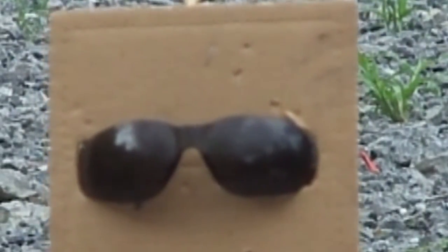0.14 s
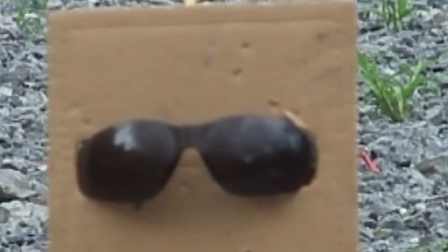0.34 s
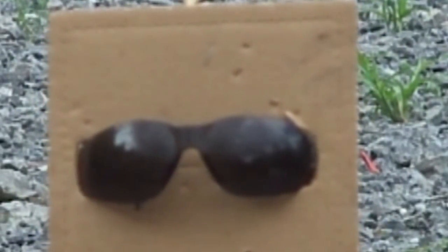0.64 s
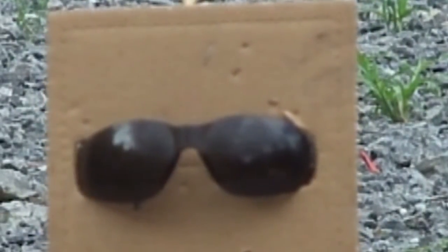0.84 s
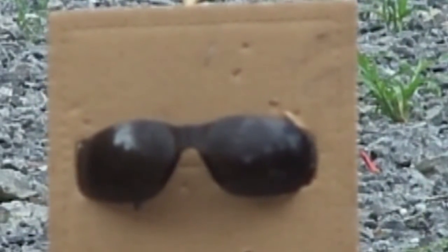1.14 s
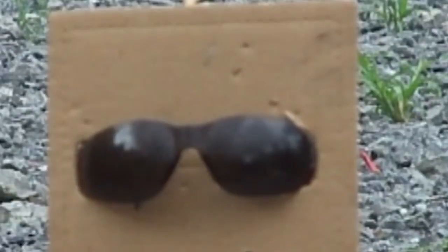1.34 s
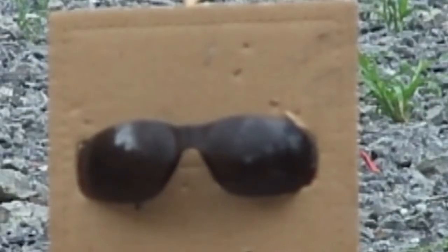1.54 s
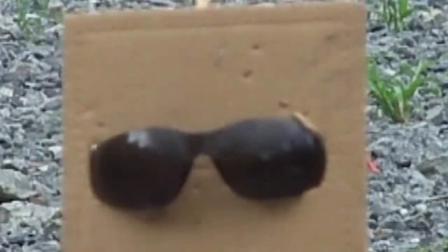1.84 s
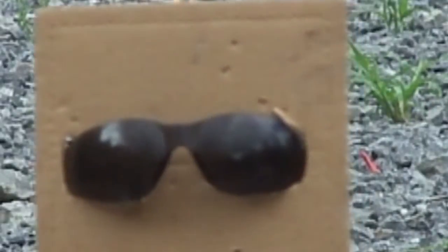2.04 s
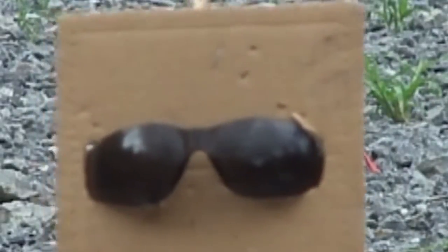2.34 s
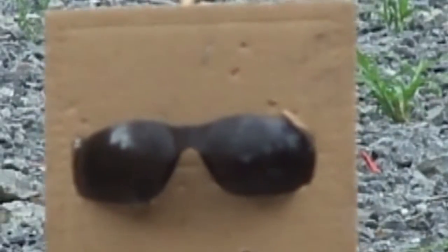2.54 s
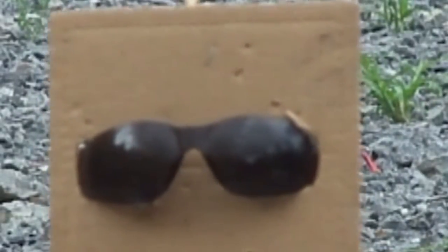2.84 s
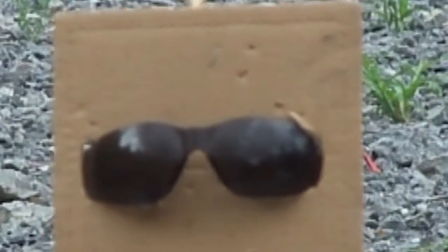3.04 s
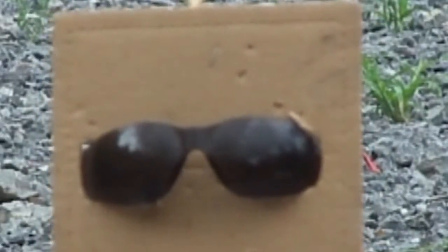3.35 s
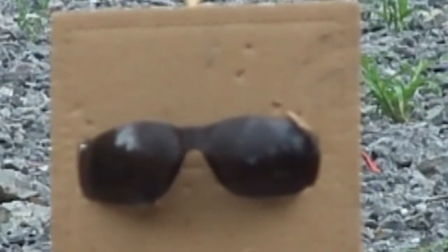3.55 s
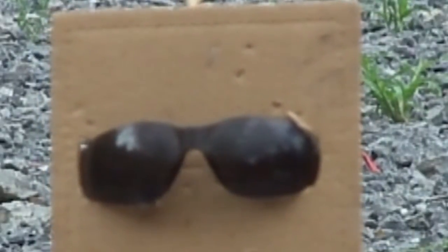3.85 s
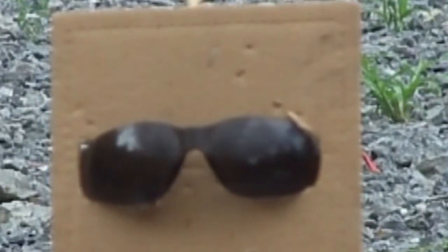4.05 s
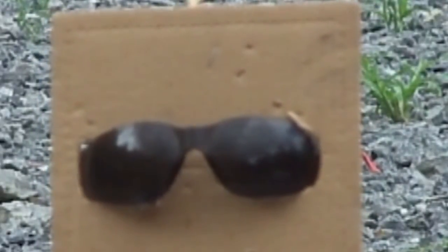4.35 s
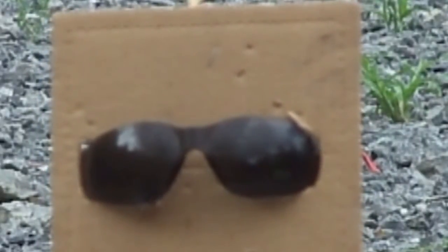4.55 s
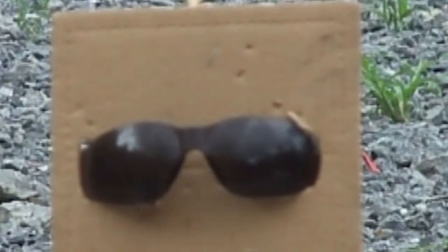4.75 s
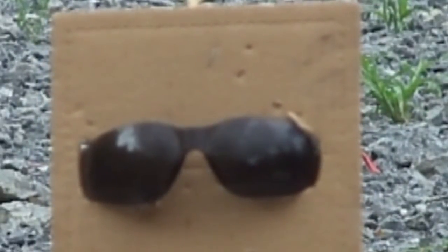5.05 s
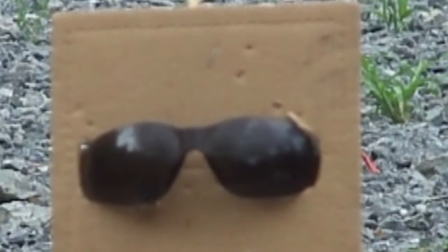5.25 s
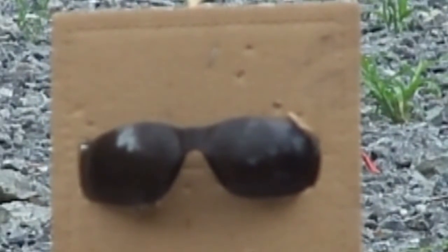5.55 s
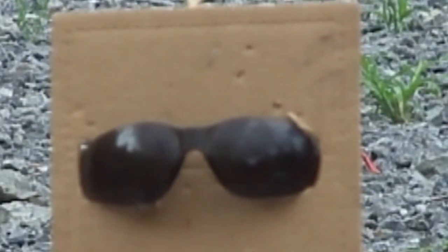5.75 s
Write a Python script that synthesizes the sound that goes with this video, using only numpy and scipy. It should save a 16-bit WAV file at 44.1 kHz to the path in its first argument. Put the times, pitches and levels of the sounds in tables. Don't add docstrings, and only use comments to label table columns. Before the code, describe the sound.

Fading echo of an earlier gunshot, then one sharp close pistol crack outdoors, its roll dying away amid clattering grit and ringing brass.

```python
import sys
import numpy as np
from scipy import signal
from scipy.fft import rfft, irfft
from scipy.io import wavfile
from scipy.ndimage import uniform_filter1d

SR = 44100
rng = np.random.default_rng(int(sys.argv[2]) if len(sys.argv) > 2 else 0)


def transcribe(u):
    v = np.clip(np.atleast_2d(u).T, -1, 1)
    q = np.round(v * 32767).astype(np.int16)
    wavfile.write(sys.argv[1], SR, q)


def volts_from_decibels(level):
    exponent = np.asarray(level, float) / 20
    return 10 ** exponent


N = 260190
TAPS = 1024
BLAST_S, EARLIER_SHOT_S = 1.87245, -.3

# (frequency [Hz], level [dB per Hz])
HISS_COLOUR = [(24, -64), (40, -23), (92, -8), (330, -4), (544, -4), (1730, -7), (2390, -14.5), (2780, -22),
               (3670, -26.5), (5350, -21), (8190, -24), (10000, -23.5), (10800, -39), (12900, -45),
               (14600, -23), (16100, -40)]
# (frequency [Hz], side minus mid [dB])
HISS_WIDTH = [(60, -6.5), (110, -5), (200, 3.5), (380, 4), (700, 3.5), (1290, 1.5), (2380, -1),
              (4400, -2.5), (8120, 0.5), (15000, -2.5)]
# (frequency [Hz], level [dB per Hz])
ECHO_COLOUR = [(24, -87), (60, -42), (172, -21), (445, -7.5), (946, 0), (2010, -9), (2780, -20.5),
               (3300, -25), (4600, -31.5), (5300, -23.5), (6700, -26), (10200, -35), (10700, -72),
               (16100, -67)]
# (frequency [Hz], side minus mid [dB])
ECHO_WIDTH = [(60, -9), (110, -43), (200, -66), (380, -30), (700, -17.5), (1290, -11.5), (2380, -9),
              (4400, -7.5), (8120, -3.5), (15000, 6)]
# (arrival [s], level [dB], hold [s], t60 [s], depth [dB])
ECHO_RETURNS = [(-.01, -15.5, 0.04, 0.81, -2), (0.052, -21, 0.077, 1.3, 6.5), (-.01, -31.5, 0.32, 2.44, 2),
                (1.867, -20, 0.71, 0.23, 2.5), (1.87, -28, 0.68, 2.7, 5.5), (1.8686, -17.5, 0.022, 0.43, 0),
                (1.91, -16, 0.12, 0.21, 3.5), (2.074, -20, 0.056, .15, -3), (2.204, -19, 0.069, 0.075, 8),
                (2.385, -18.5, 0.13, .25, 1), (2.614, -24, 0.023, 0.78, 0)]
# (time [s], level [dB], left minus right [dB])
GRAVEL_TICKS = [(0.249, -44, -10.5), (0.3815, -40.5, -9), (0.499, -42, 2), (0.6114, -48, 1),
                (0.6604, -41, 1), (0.809, -46, -7), (0.8785, -44, -2), (1.5928, -40, 2), (2.9277, -36, -1),
                (2.978, -41.5, 4), (3.783, -39.5, 2), (3.9215, -43, -0.5), (4.419, -37, 1),
                (4.9551, -41.5, 0.0), (5.8127, -39, 3), (5.843, -38, 4)]
# (time [s], frequency [Hz], level [dB], t60 [s], steady [ms])
BRASS_RINGS = [(0.238, 11600, -49, 0.19, 2.4), (0.497, 5070, -38, 0.12, 1.6),
               (0.551, 5100, -48, 0.047, 0.73), (2.61, 11400, -46, 0.17, 3.6),
               (3.158, 11500, -42, 0.066, 2.8), (3.3, 12200, -45, 0.13, 2)]
# (time [s], level [dB])
HOPS = [(3.8178, -19.5), (3.8222, -24), (3.8265, -16.5), (3.832, -29), (3.846, -27), (3.859, -30),
        (3.88, -33)]
# (frequency [Hz], level [dB], t60 [s])
HOP_MODES = [(480, 10, 0.026), (640, 12, 0.024), (820, 10, 0.02), (1150, 5, 0.014)]
# (time [s], peak [dB], contact [ms])
HARD_STRIKES = [(2.5243, -1.5, .12), (2.6084, -6, .22), (2.6352, -10, .2), (3.1574, -10, .16),
                (3.1612, -11, .05), (3.2075, -21, .3), (3.4168, -17, .025)]
# (time [s], grit [dB], knock above grit [dB], grit t60 [s], rise [ms])
LANDINGS = [(.0338, -25.5, 7.5, 0.21, 0.19), (.238, -28, -5, 0.11, .2), (2.115, -32.5, 18, 0.6, 3.4),
            (2.196, -35.5, 19, .1, 7.7), (2.234, -32, 14.5, 0.049, 2.2), (2.5251, -21.5, -2.5, 0.24, 0.22),
            (2.609, -23, 5.5, 0.19, 0.5), (3.157, -21, 2.5, 0.21, 0.22), (3.1607, -17.5, -2.5, 0.13, 0.49),
            (3.3008, -24, -3, 0.17, 2.8), (3.367, -38, 1, 0.36, 5.6), (3.4165, -31.5, -12, 0.17, 0.16),
            (3.4198, -37, -9, 0.068, 0.74)]
# (frequency [Hz], level [dB per Hz])
GRIT_COLOUR = [(1500, -24), (2500, -4.5), (3400, -15), (4200, -11.5), (5250, 0), (6500, 2.5), (8100, 5.5),
               (9700, 2.5), (10500, -0.5), (11000, -50), (12800, -56), (13600, -12.5), (15200, -18),
               (16300, -9)]
# (frequency [Hz], side minus mid [dB])
GRIT_WIDTH = [(60, -1), (110, -2), (200, -1), (380, -14), (700, -12), (1290, 1), (2380, 2), (4400, -8),
              (8120, -2), (15000, 4.5)]
# (frequency [Hz], level [dB per Hz])
KNOCK_COLOUR = [(60, -75), (150, -43.5), (260, -8.5), (470, -3), (800, -4), (1280, 0), (2000, -8.5),
                (2500, -20.5), (3100, -26), (6600, -100)]
# (frequency [Hz], level [dB], t60 [s])
BOARD_MODES = [(467, -1, 0.42), (765, 4.5, 0.12), (997, 2, 0.15), (1272, -4.5, 0.098), (1674, -3, 0.13)]
# (peak [dB], half wave [ms], ring [ms], crack rise [ms], crack fall [ms])
MUZZLE = (-2.2, .58, 1.3, .85, .6)
# (frequency [Hz], level [dB per Hz])
CRACK_COLOUR = [(500, -17), (2000, 7), (3500, 5), (6500, -3.5), (9000, -3.5), (12000, -10), (16000, -21),
                (20000, -23)]
# (frequency [Hz], width [Hz], level [dB])
BODY_DIPS = [(2749, 990, -62), (3680, 850, -41), (4623, 510, -41), (12730, 2500, -7.5), (10290, 3400, -15)]


def unit(x):
    return x / np.sqrt(np.mean(x ** 2))


def band(x, lo_hz, hi_hz):
    return signal.sosfilt(signal.butter(2, [lo_hz, hi_hz], "band", fs=SR, output="sos"), x)


def response(*spectra):
    log_hz = np.log(np.maximum(np.arange(TAPS + 1) * SR / (2 * TAPS), 1))
    db = 0
    for spectrum in spectra:
        hz, level_db = np.transpose(spectrum)
        db = db + np.interp(log_hz, np.log(hz), level_db)
    cepstrum = irfft(db * np.log(10) / 20)
    cepstrum[1:TAPS] *= 2
    cepstrum[TAPS + 1:] = 0
    return irfft(np.exp(rfft(cepstrum)))[:TAPS]


def colour(x, h):
    return signal.fftconvolve(x, h, axes=-1)[..., :x.shape[-1]]


def wide(x, spectrum, side):
    h = response(spectrum)
    mid = colour(x[0], h)
    off = colour(x[1], response(spectrum, side))
    return np.array([mid + off, mid - off]) / np.linalg.norm(h)


def walk(rate):
    k = int(SR / rate)
    held = np.repeat(rng.standard_normal(N // k + 1), k)
    return uniform_filter1d(uniform_filter1d(held, k), k)[:N]


def grains(size, scatter_db):
    strength_db = scatter_db * np.minimum(rng.exponential(size=size), 5)
    return unit(rng.standard_normal(size) * volts_from_decibels(strength_db))


def add(out, x, s, pan_db=0):
    i = int(s * SR)
    x = x[..., :N - i]
    out[:, i:i + x.shape[-1]] += x * volts_from_decibels(np.array([[pan_db], [-pan_db]]) / 2)


def hiss(loud):
    level = np.sqrt(uniform_filter1d(np.mean(loud ** 2, axis=0), SR // 20).clip(0))
    duck = 1 / (1 + level / volts_from_decibels(-8.5))
    floor = wide(rng.standard_normal((2, N)), HISS_COLOUR, HISS_WIDTH) * volts_from_decibels([[-.4], [.4]])
    return floor * duck * volts_from_decibels(-43.5 + 1.0 * walk(2.193) + 0.24 * walk(6.2))


def echoes():
    t = np.arange(N) / SR
    roll = wide(grains((2, N), 1.0), ECHO_COLOUR, ECHO_WIDTH)
    treble, bass, body = band(roll, 2800, 15000), band(roll, 60, 330), band(roll, 420, 700)

    s, db, hold, t60, depth_db = (column[:, None] for column in np.transpose(ECHO_RETURNS))
    rise = ((t - s) / .003).clip(0, 1) ** 2
    power = rise * volts_from_decibels(2 * (db - 60 * (t - s - hold).clip(0) / t60)) + 1e-12
    total = power.sum(axis=0)
    level_db = 10 * np.log10(total)
    body_db = (power * depth_db).sum(axis=0) / total

    since = t - BLAST_S
    age = np.where(since > 0, since, t - EARLIER_SHOT_S)
    fade_db = (-16 - level_db).clip(0, 14)
    treble_db = 3.46 - np.minimum(7.5 * age, 6) - 0.03 * fade_db
    bass_db = 0.5 + 0.9055 * fade_db
    mix = roll + (volts_from_decibels(treble_db) - 1) * treble + (volts_from_decibels(bass_db) - 1) * bass + (volts_from_decibels(body_db) - 1) * body

    air = unit(band(rng.standard_normal((2, N)), 13800, 15300))
    air = air * (since > 0) * volts_from_decibels(-44 - 60 * since.clip(0) / 0.72)
    lumpy = ((level_db + 36) / 15).clip(.2, 1)
    return (np.sqrt(total) * mix + air) * volts_from_decibels(lumpy * (0.9 * walk(40.05) + 1.3 * walk(14.34)))


def gravel_ticks():
    out, t = np.zeros((2, N)), np.arange(SR // 4) / SR
    for s, db, pan_db in GRAVEL_TICKS:
        scrape = rng.standard_normal((2, len(t))) * np.exp(-t / 0.0053)
        add(out, volts_from_decibels(db - 5) * wide(scrape, GRIT_COLOUR, GRIT_WIDTH), s - .001, pan_db)
    return out


def ringing_brass():
    out, t = np.zeros((2, N)), np.arange(SR // 4) / SR
    for s, hz, db, t60, steady_ms in BRASS_RINGS:
        tumble = unit(uniform_filter1d(rng.standard_normal(len(t)), int(steady_ms * SR / 1000) + 1))
        ring = volts_from_decibels(db - 60 * t / t60) * (0.61 + tumble) * np.sin(2 * np.pi * hz * t)
        add(out, ring, s, 3 * rng.standard_normal())
    return out


def hopping_thud():
    out, t = np.zeros((2, N)), np.arange(SR // 4) / SR
    for s, hop_db in HOPS:
        place_db = 2 * rng.standard_normal(len(HOP_MODES))
        ring = np.zeros(len(t))
        for (hz, db, t60), spot_db in zip(HOP_MODES, place_db):
            ring += volts_from_decibels(db + spot_db - 60 * t / t60) * np.sin(2 * np.pi * hz * t)
        ring = colour(ring, np.hanning(18))
        add(out, -volts_from_decibels(hop_db) * ring / np.abs(ring).max(), s)
    return out


def hard_strikes():
    out, t = np.zeros((2, N)), np.arange(SR // 4) / SR
    for s, db, contact_ms in HARD_STRIKES:
        u = t * 1000 / contact_ms - 2
        add(out, volts_from_decibels(db) * -u * np.exp(.5 - u ** 2 / 2), s - contact_ms / 500)
    return out


def small_hits():
    hits = gravel_ticks() + ringing_brass() + hopping_thud() + hard_strikes()
    return signal.sosfilt(signal.butter(2, 220, "high", fs=SR, output="sos"), hits)


def board_response():
    t = np.arange(SR // 8) / SR
    ring = sum(volts_from_decibels(db - 60 * t / t60) * np.sin(2 * np.pi * hz * t) for hz, db, t60 in BOARD_MODES)
    return band(ring / np.linalg.norm(ring), 330, 3000)


def bounces():
    out, lead_s = np.zeros((2, N)), .02
    t = np.arange(SR // 2) / SR - lead_s
    knock_h = unit(response(KNOCK_COLOUR)) / np.sqrt(TAPS)
    board_h = board_response()
    for s, db, knock_db, t60, rise_ms in LANDINGS:
        swell = np.exp(np.minimum(t, 0) * 1000 / max(rise_ms, .05))
        contact = grains((2, len(t)), 2.66) * swell
        first = 1 + 1.4 * np.exp(-np.abs(t) / 0.00072)
        tilt_db = -7.5 - 1.41 * min(knock_db, 0)
        tilt = [(4500, -tilt_db), (9000, tilt_db), (14000, 0.0054)]
        grit = colour(contact * first * volts_from_decibels(-60 * t.clip(0) / t60), response(tilt)[None])
        push = contact[0] * volts_from_decibels(-60 * t.clip(0) / 0.37)
        knock = colour(push, knock_h) + volts_from_decibels(-6.5) * colour(push, board_h)
        landing = wide(grit, GRIT_COLOUR, GRIT_WIDTH) + volts_from_decibels(knock_db) * knock
        add(out, volts_from_decibels(db) * landing, s - lead_s)
    return out


def blast():
    peak_db, half_ms, ring_ms, rise_ms, fall_ms = MUZZLE
    lead = 300
    ms = np.arange(-lead, 1400) * 1000 / SR
    wave = -np.sin(np.pi * ms / half_ms) * (ms > 0) * np.exp(-((ms - half_ms) / ring_ms) ** 2)
    wave = signal.sosfilt(signal.butter(1, 120, "high", fs=SR, output="sos"), wave)
    swell = np.exp(np.minimum(ms / rise_ms, (half_ms - ms) / fall_ms).clip(None, 0))
    crack = wide(rng.standard_normal((2, len(ms))) * swell, CRACK_COLOUR, ECHO_WIDTH)
    out = np.zeros((2, N))
    add(out, volts_from_decibels(peak_db) * wave + volts_from_decibels(-4.5) * crack, BLAST_S - lead / SR)
    return out


def scene():
    shot = blast() + echoes()
    return shot + bounces() + small_hits() + hiss(shot)


def low_pass(x):
    return signal.sosfilt(signal.butter(12, 16290, fs=SR, output="sos"), x)


def record(dry):
    x = dry
    for hz, width_hz, db in BODY_DIPS:
        x = x - (1 - volts_from_decibels(db)) * signal.lfilter(*signal.iirpeak(hz, hz / width_hz, SR), x)
    x = signal.sosfilt(signal.ellip(8, .3, 60, 15750, fs=SR, output="sos"), x)
    return low_pass(np.clip(x, -1, 1))


dry = scene()
out = record(dry)
transcribe(out)
```